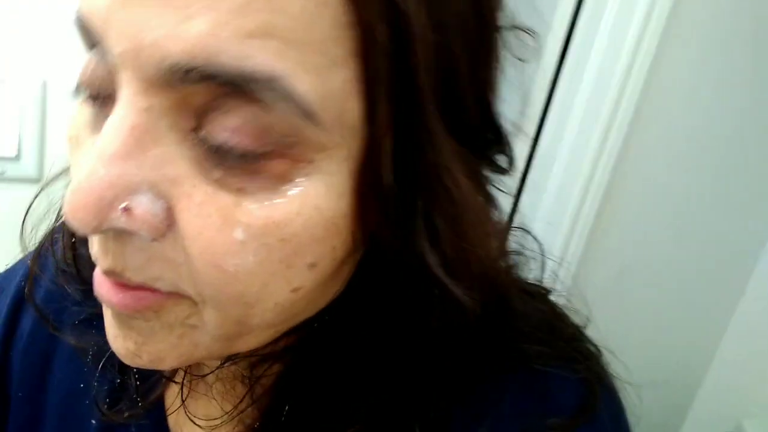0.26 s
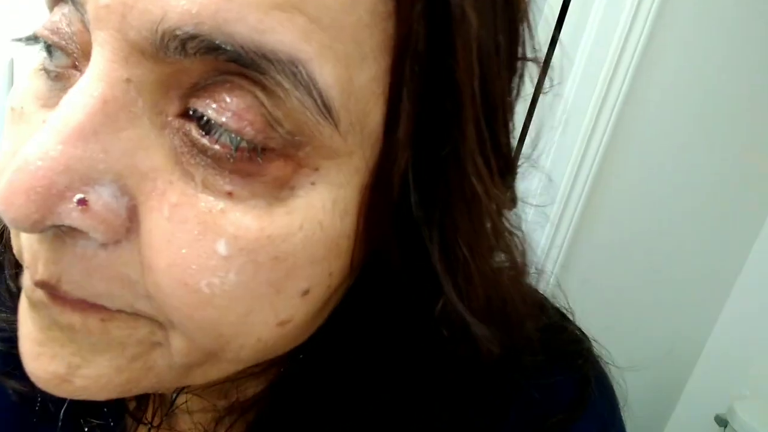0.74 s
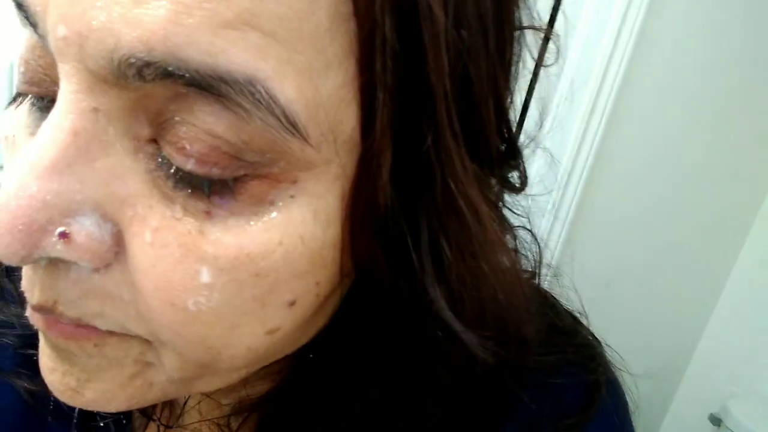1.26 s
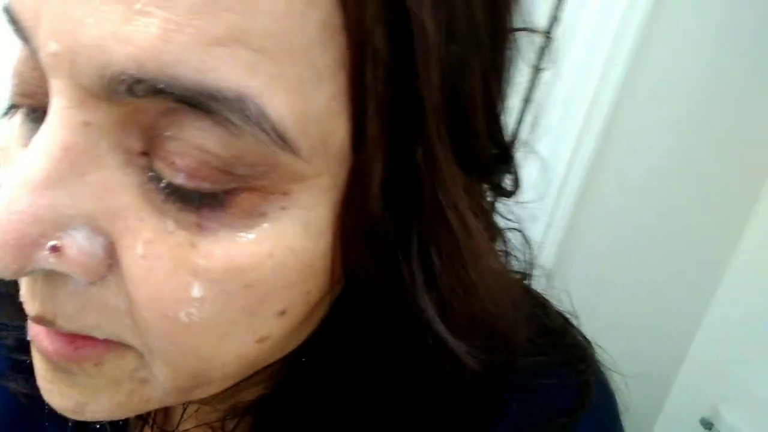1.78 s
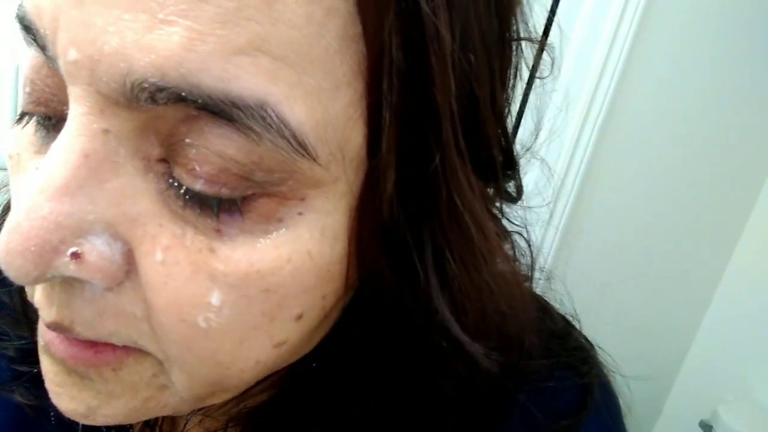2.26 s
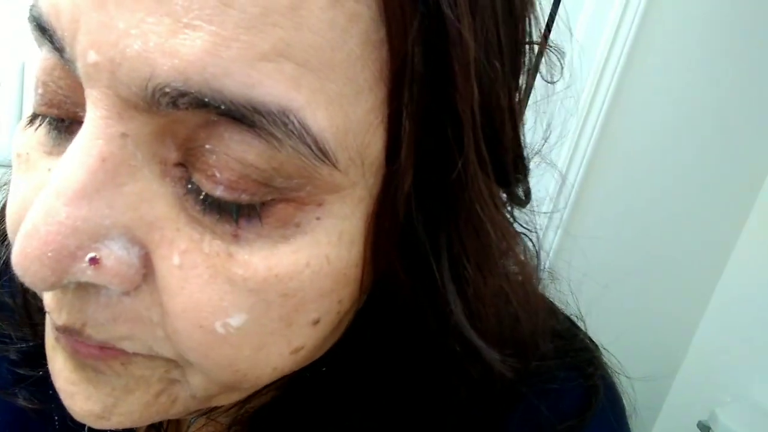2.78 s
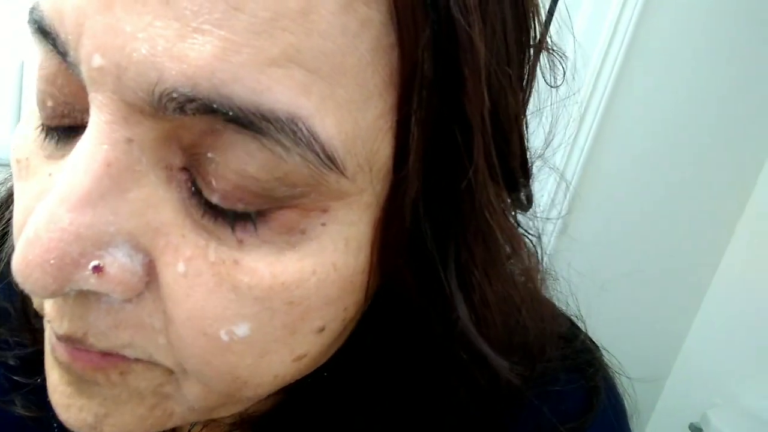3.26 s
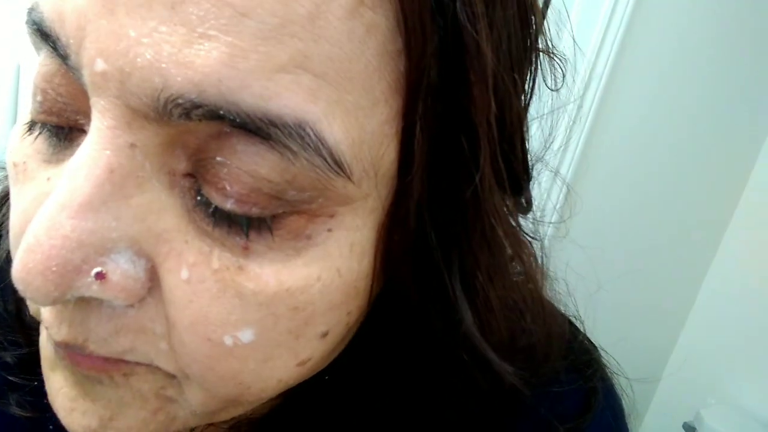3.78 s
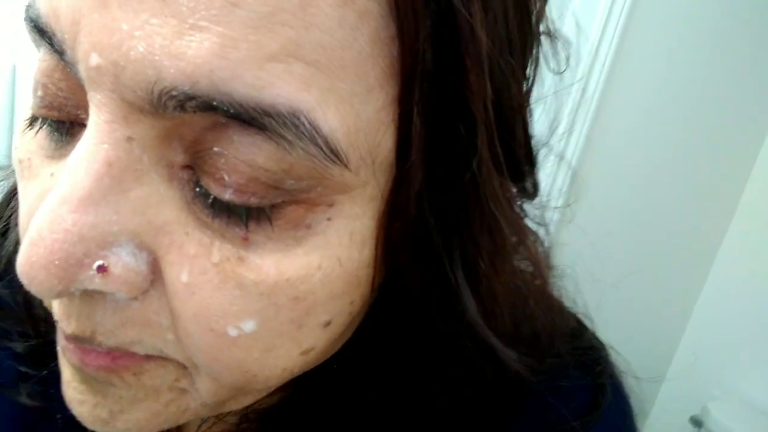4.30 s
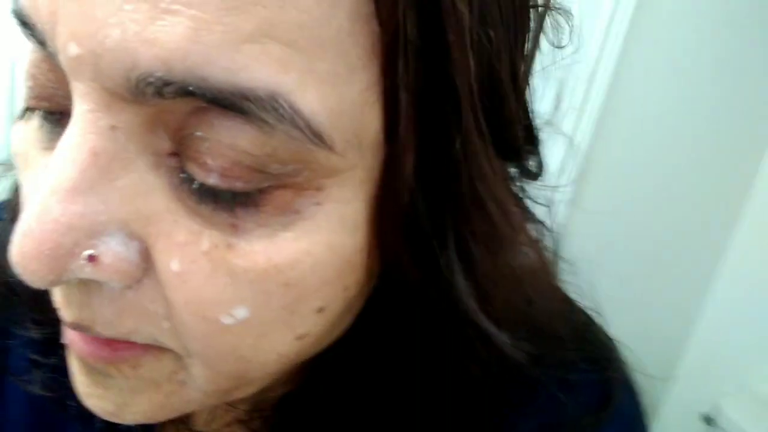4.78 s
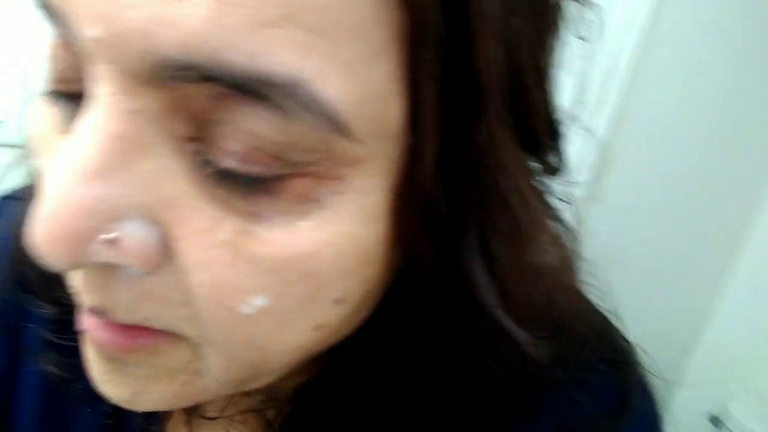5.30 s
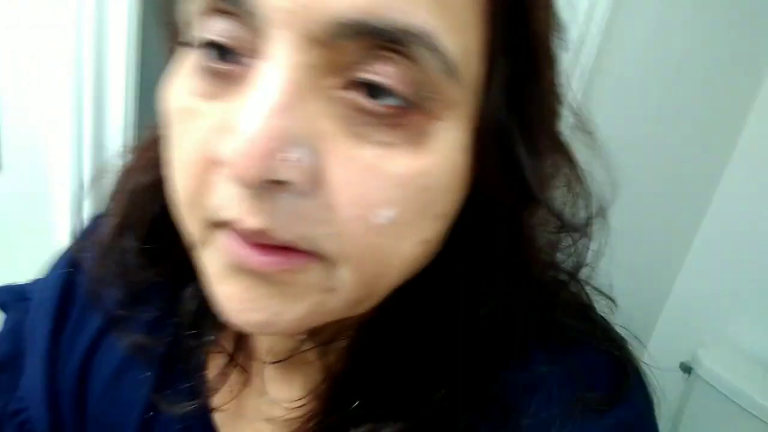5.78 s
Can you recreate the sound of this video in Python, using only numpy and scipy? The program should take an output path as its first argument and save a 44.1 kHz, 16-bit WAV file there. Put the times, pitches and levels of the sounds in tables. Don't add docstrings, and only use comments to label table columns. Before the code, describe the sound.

In a small tiled bathroom, a tap's bright hiss and splash shuts off almost at once, leaving tiny drips and a brief low pipe shudder. After a short quiet, a tissue roll is tugged: paper rustles and crinkles, the roll rumbles round and knocks its holder, with small springy plinks. The loudest blows come near the end, then it settles. A phone held close hears it in stereo, treble leaning left, over a faint low hum.

```python
import sys
import numpy as np
from scipy import signal
from scipy.fft import rfft, irfft, next_fast_len
from scipy.io import wavfile
from scipy.ndimage import uniform_filter1d, map_coordinates

SR = 44100
rng = np.random.default_rng(int(sys.argv[2]) if len(sys.argv) > 2 else 0)


def wrap_up_sound(samples):
    columns = np.atleast_2d(samples).T
    tamed = np.clip(columns, -1, 1)
    steps = np.round(tamed * 32767).astype(np.int16)
    wavfile.write(sys.argv[1], SR, steps)


def boost(x):
    u = np.asarray(x, float) / 20
    return 10 ** u


N = 266805

# start_s [s], peak_db [dB], thud_db [dB], hardness_db [dB], click_db [dB]
HARD_BLOWS = [(1.058, -34, -2.5, 3.5, -33), (1.278, -18.5, -8.5, -2.5, -16), (1.467, -35, -6.5, -8, -18),
              (1.553, -19.5, -5, -1, -20), (1.775, -29.5, -8.5, -7, -35.5),
              (2.59, -40.5, -10.5, -12, -18.5), (2.8155, -29, -8.5, -4.5, -37.5),
              (3.6054, -40, -1.5, -12, -26.5), (4.277, -33.5, -6.5, -17.5, -36),
              (4.358, -25, -11.5, -11.5, -47.5), (4.522, -23, -2.5, 1.5, -20), (4.565, -37.5, 5.5, -8, -23),
              (4.847, -22, -4, 0, -19.5), (5.032, -30, -11, -16.5, -36), (5.1, -20.5, -5.5, 1, -19)]
# pitch_hz [Hz], width_hz [Hz], level_db [dB]
ROOM_WAVES = [(139, 12, 2), (220, 31, 3.5), (335.2, 20, 1.5), (402.6, 21.8, 4.5), (465.3, 22, 1),
              (524, 18, -2.5), (590, 22, 0.5), (728, 58, 0), (904, 44, 0), (1041, 38, 3), (1126, 30, -1.5),
              (1224, 34, 1.5), (1323, 36, -3.5), (1406, 43, -7), (1620, 8.7, -6.5), (1780, 28, -18.5),
              (2210, 45, -3)]
# pitch_hz [Hz], time to fall 60 dB [s]
TILE_DECAY = [(100, 0.51), (260, 0.32), (700, 0.33), (1800, 0.31), (5000, 0.25), (13000, 0.15)]


def tap():
    # time_s [s], jet_db [dB]
    flow = [
        (0.0, -43),
        (0.032, -40.5),
        (0.15, -43.5),
        (0.19, -44.5),
        (0.302, -55),
        (0.398, -81.5),
        (0.48, -86),
    ]
    # pitch_hz [Hz], level_db [dB per Hz]
    jet_colour = [(880, -44), (1500, -11), (2880, -3), (3920, -1.5), (4460, -1), (6060, 0.5), (7460, -3),
                  (12700, 2), (16000, -3.5)]
    # pitch_hz [Hz], level_db [dB per Hz]
    basin_colour = [(71, -36.5), (120, -11.5), (157, -20), (208, 1.5), (259, -11.5), (312, -1), (461, -17),
                    (691, -5.5), (770, -10), (1530, -17.5), (3000, -22.5), (3900, -49), (6600, -120)]
    # start_s [s], peak_db [dB], pitch_hz [Hz], time to fall 60 dB [s]
    spits = [(0.302, -37, 3350, 0.024), (0.2403, -34, 4700, 0.014), (0.302, -38.5, 2320, 0.018),
             (0.3194, -40.5, 3055, 0.088), (0.379, -51, 4500, 0.036), (0.4813, -51.5, 4960, 0.02),
             (0.5057, -59, 2530, 0.071), (0.5626, -57, 2660, 0.036), (0.61, -57.5, 1980, 0.077),
             (0.6894, -64, 3600, 0.044), (.222, -36, 6000, .02), (.26, -36, 6140, .02),
             (.497, -60, 2750, .08), (.598, -60, 2260, .03), (.611, -62, 5060, .1), (.611, -63, 945, 0.086),
             (.612, -62, 3300, 0.072)]
    # time_s [s], pitch_hz [Hz], level_db [dB]
    pipe = [
        (0.68, 82.1, -73),
        (0.752, 84.3, -46.5),
        (0.824, 81.2, -59.5),
        (0.842, 79.1, -48.5),
        (0.884, 82.1, -83.5),
        (0.92, 80, -68.5),
    ]

    jet_db, = curves(flow, -160)
    basin_db = -51 + 0.52 * np.minimum(jet_db + 42, 0)
    water = boost(jet_db + 1.1 * wobble(40)) * rush(jet_colour, grain_db=1.5, grains=700, depth=0)
    water += boost(basin_db + 2.6 * wobble(27)) * rush(basin_colour, grain_db=-0.5, grains=190, depth=0.54)

    pitch_hz, = curves([row[:2] for row in pipe])
    pipe_db, = curves([row[::2] for row in pipe], -120)
    shudder = np.sqrt(2) * boost(pipe_db) * np.sin(2 * np.pi * np.cumsum(pitch_hz) / SR)
    drops = rings(spits, partner=1.95, blur=.14, snap=1.1, wet_db=-8)
    return patches(water, depth_db=1.5) + drops + shudder


def hard_knocks():
    # start_s [s], peak_db [dB], thud_db [dB], hardness_db [dB], click_db [dB]
    rattles = [(0.983, -60, -5, 4, -6), (1.203, -40, -9.5, -12, -36), (1.846, -37, -3, -9.5, -28),
               (1.868, -40, -3, -10, -16), (2.214, -53.5, -6, -14, -20), (2.6684, -47, -2.5, -10, -10),
               (1.748, -52.5, -6, 2, -12), (2.046, -60, 3.5, -12, -24), (2.256, -47.5, -2.5, -14, -36),
               (3.008, -53, -7.5, -6, -24), (3.235, -47, -0.5, -8, -19), (3.379, -54.5, 5.5, -4.5, -32.5),
               (3.419, -46, -9, -18, -28), (3.907, -46, -0.5, -8.5, -13), (4.205, -49, 0, -2, -14),
               (5.2355, -47, -4, 4, -12.5)]
    return knocks(HARD_BLOWS + rattles, attack=.0015)


def soft_strokes():
    # start_s [s], peak_db [dB], thud_db [dB], hardness_db [dB], click_db [dB]
    soft_events = [
        (.135, -49.5, -0.5, -3, -29),
        (.94, -62, 10, 1, -4),
        (1.543, -32, -9, -17, -44),
        (2.67, -46, -4.5, -11, -36),
        (3.978, -40.5, -0.5, -14.5, -13),
        (4.69, -44, 5.5, -1.5, -18.5),
    ]
    return knocks(soft_events, attack=0.013)


def knocks(blows, attack):
    # pitch_hz [Hz], level_db [dB per Hz]
    holder = [(35, -40.5), (60, -5.5), (180, -10.5), (245, -5.5), (338, -0.5), (527, -7), (593, -4),
              (666, -8.5), (1200, -7.5), (1340, -13.5), (2190, -17), (8510, -43.5), (12400, -42),
              (16000, -52.5)]
    # pitch_hz [Hz], level_db [dB]
    usual = [(300, 1), (640, 2.5), (1250, -0.5), (2800, -10.5), (8500, -23.5)]
    out, length = np.zeros((2, N + SR)), SR // 2
    t = np.arange(length) / SR
    centres_hz, usual_db = np.transpose(usual)
    for s, db, thud_db, hard_db, click_db in blows:
        # thud, body, 1 kHz knock, 3 kHz clack and click; hardness lifts both knock and clack
        bands_db = np.array([thud_db, 0, hard_db, hard_db - 6.5, click_db])
        shift = np.transpose([centres_hz, bands_db - usual_db])
        swell = t / attack * np.exp(1 - t / attack) + 0.00073 / attack * boost(-60 * t / 0.0024)
        direct = swell * boost(-20 * t / (3 * attack)) * rng.standard_normal((2, length))

        rise = 1 - np.exp(-t / attack)
        flutter_phase = -1.2 + rng.normal(0, 0.54)
        flutter = boost(2.0 * np.cos(2 * np.pi * 44.0 * t + flutter_phase))
        early = 1 + 0.81 * boost(-60 * t / 0.15)
        early += 0.37 / (1 + (t / .048) ** 16)
        waves = boost(-19.5) * standing_waves(t)
        room = rise * flutter * (early * tail(length) + waves)
        both = boost(0.5) * direct / np.linalg.norm(direct[0]) + room

        def struck_gain(hz):
            tube_db = .7 * max(-29 - click_db, 0) / (1 + ((hz - 1600) / 260) ** 4)
            return boost(along(holder, hz) + along(shift, hz) + tube_db) * room_modes(hz, depth=4.84)

        sound = stereo(both, struck_gain)
        peak = np.sqrt(np.mean(sound[:, :SR // 40].mean(0) ** 2))
        power = 1 + boost(thud_db) ** 2 + boost(hard_db) ** 2
        crack = np.diff(rng.standard_normal((2, length + 1)))
        crack = crack * boost(click_db - 3.0 - 60 * t / 0.012) * 0.0014 / attack
        blow = boost(db - 4.0) * np.sqrt(power) * sound / peak + boost(db) * crack
        out[:, round(s * SR):][:, :length] += blow
    return out[:, :N]


def holder_parts():
    # start_s [s], peak_db [dB], pitch_hz [Hz], time to fall 60 dB [s]
    struck = [(1.059, -28, 1430, 0.09), (1.059, -32, 850, 0.47), (1.06, -32, 597.6, 0.44),
              (1.06, -40, 1950, .1), (1.279, -20, 754, 0.17), (1.279, -29, 590, 0.094),
              (1.555, -23, 697, 0.15), (1.32, -26, 400, .04), (1.597, -29, 398, .04),
              (1.075, -31.5, 1112, 0.18), (2.85, -31, 579, 0.21), (1.777, -36, 590, .15),
              (1.847, -40.5, 590, 0.11), (2.592, -40, 581, 0.24), (2.818, -25.5, 585.5, 0.33),
              (2.82, -34, 1596, 0.13), (3.612, -33, 1055, 0.076), (3.62, -41.5, 590, 0.19),
              (3.67, -40, 1530, 0.071), (3.772, -45.5, 1018, 0.033), (3.88, -46, 1200, .03),
              (3.91, -43.5, 1300, .1), (3.99, -44, 420, .1), (4.075, -41.5, 100.2, 0.12),
              (4.285, -32, 606, .08), (4.36, -29.5, 1056, 0.067), (4.375, -30.5, 590, .15),
              (4.523, -25, 332.4, 0.14), (4.525, -7.5, 393, 0.038), (4.524, -18, 1044, 0.037),
              (4.565, -17, 338, 0.045), (4.848, -16, 1026, 0.059), (4.849, -11.5, 346, 0.049),
              (4.85, -28.5, 2200, 0.1), (4.89, -26.5, 344, 0.086), (5.033, -28.5, 700, .04),
              (5.101, -14, 1059, 0.15), (5.102, -24.5, 1189, 0.22), (5.102, -20.5, 336, 0.036),
              (5.103, -21.5, 590, 0.13), (5.145, -28, 395, 0.033)]
    return rings(struck, partner=1.0, blur=0.03, snap=0, wet_db=-7)


def spring():
    # start_s [s], peak_db [dB], pitch_hz [Hz], time to fall 60 dB [s]
    plinks = [(1.4675, -38.5, 2470, 0.033), (1.7515, -35.5, 2320, 0.081), (2.682, -41, 2300, 0.06),
              (2.684, -56, 3150, 0.059), (2.824, -17.5, 1060, 0.08), (3.2355, -39, 2050, 0.085),
              (3.632, -42, 2170, .04), (3.925, -48, 1300, 0.054), (4.051, -40, 907, 0.19),
              (4.372, -32, 1620, 0.18), (4.937, -24.5, 1950, 0.04), (5.0324, -31, 3150, 0.075),
              (5.236, -23.5, 1890, 0.035)]
    return rings(plinks, partner=1.6, blur=.06, snap=.06, wet_db=-16)


def paper():
    # [s, s]
    tugs = [(.83, -79, -64, 0.08, 0.3), (.96, -76, -65.5, 0.24, 3.5), (1.12, -80, -58.5, 0.17, 0.5),
            (1.21, -69, -62, 0.07, 0.4), (1.41, -66, -52, 0.04, 0.1), (1.66, -64, -63, 0.02, 0),
            (1.875, -74.5, -63, 0.35, -0.2), (2.11, -69, -58.5, 0, 0.2), (2.27, -80, -67, -0.5, 0.3),
            (2.37, -66.5, -55, 0.1, 0.09), (2.575, -73.5, -54.5, 0.04, 0.3),
            (2.685, -68.5, -54.5, -0.09, 0.14), (2.95, -66.5, -54.5, 0.04, 0.15), (3.12, -75, -61, 0, 0.06),
            (3.238, -69.5, -55.5, -0.03, 0.18), (3.425, -77, -62.5, 0.08, -0.14),
            (3.71, -76, -62.5, -0.12, 0.9), (3.86, -65, -55, 0.1, 0.32), (3.92, -68.5, -51.5, 0, 0.12),
            (3.995, -65.5, -45, 0.0858, 0.07), (4.4, -64, -52.5, 0.07, 0.19),
            (4.72, -62, -47.5, 0.06, 0.09), (4.79, -72.5, -59.5, 0.42, 0.2), (3.78, -82, -59.5, -0.2, 0.85),
            (4.47, -70, -59, 0.2, .1), (5.34, -86.5, -72.5, 1.5, 0.9), (5.672, -69, -65, 0.055, 0.1),
            (5.835, -76, -67, 0.07, 0.24)]
    # start_s [s], hiss_db [dB], crinkle_db [dB], time to fall 20 dB [s]
    jolts = [(1.061, -60, -56.5, 0.15), (1.281, -67, -32, 0.1151), (1.469, -68, -54, 0.3),
             (1.557, -56, -39.5, 0.15), (1.748, -60.5, -55, 0.04), (1.847, -77, -58, 0.17),
             (2.817, -75, -55.5, 0.33), (3.604, -72, -56.5, 0.5), (4.2, -65, -57, 0.3),
             (4.528, -55, -41, 0.17), (4.688, -59, -48.5, 0.2248), (4.849, -53.5, -32.5, 0.1275),
             (5.026, -51, -46.5, 0.1171), (5.106, -48.5, -42.5, 0.0771), (5.237, -74, -47, 0.0256)]
    # top_speed_s [s], drag_db [dB], time to rise 20 dB [s], time to fall 20 dB [s]
    spins = [(1.02, -78, 0, 11), (1.26, -56, 0, 1), (1.59, -47, 0.7, 0.4), (1.8, -76, .02, 3),
             (2.37, -56.5, 0.24, 0.2), (2.84, -42.5, 0.0361, 0.25), (3.0, -66, 1.1, 0.5),
             (3.79, -56.5, 0.18, 0.7), (4.44, -43, 0.26, 0.08), (4.74, -46, 0.48, 0.09),
             (5.05, -48.5, 0.4, -0.06), (5.25, -70, -2.2, 0.75)]
    # pitch_hz [Hz], level_db [dB per Hz]
    hiss_colour = [(3500, -29.5), (5500, 6.5), (8500, -0.5), (12000, 4.5), (15500, 2), (17000, -10.5)]
    # pitch_hz [Hz], level_db [dB per Hz]
    crinkle_colour = [(900, -14), (1500, -0.5), (2500, -3), (4500, -9), (7000, -21)]
    # pitch_hz [Hz], level_db [dB per Hz]
    drag_colour = [(110, -26.5), (200, 4.5), (400, 6), (1000, 0), (1700, -39.5)]

    strokes = tugs + [(s, hiss_db, crinkle_db, .002, fall) for s, hiss_db, crinkle_db, fall in jolts]
    s, hiss_db, crinkle_db, rise, fall = np.transpose(strokes)
    stroke = wobble(30)
    fibres = boost(1.2 * stroke)
    bearing = boost(.8 * wobble(15))
    sound = swells(s, hiss_db, rise, fall) * fibres * rush(hiss_colour, grain_db=2.0, grains=1100, depth=0)
    folds = swells(s, crinkle_db - 3.5, rise, fall) * boost(1.9 * stroke)
    sound += folds * patches(rush(crinkle_colour, grain_db=1.0, grains=510, depth=4.28), depth_db=1.5)
    drag = rush(drag_colour, grain_db=2.5, grains=110, depth=1.6)
    return sound + swells(*np.transpose(spins)) * bearing * drag


def scrapes():
    # top_speed_s [s], level_db [dB], time to rise 20 dB [s], time to fall 20 dB [s]
    rubs = [
        (2.562, -50, .025, .06),
        (2.655, -58, .02, .04),
        (2.692, -46, .035, .045),
        (2.745, -57, .05, .05),
        (3.64, -54, .03, .06),
        (5.036, -47, .008, .04),
    ]
    # pitch_hz [Hz], width_hz [Hz], level_db [dB]
    bar = [(1620, 200, -4.5), (2320, 600, 0.5), (3110, 500, -1), (4220, 400, -16)]

    def bar_gain(hz):
        return np.sqrt(sum(boost(2 * db) / (1 + (2 * (hz - c) / w) ** 2) ** 2 for c, w, db in bar))

    slips = boost(1.9 * wobble(300)) * rng.standard_normal((2, N))
    return swells(*np.transpose(rubs)) * unit(stereo(slips, bar_gain))


def clicks():
    # start_s [s], peak_db [dB], time to fall 60 dB [s]
    contacts = [
        (.4805, -66, .008),
        (1.059, -48, .01),
        (1.2786, -41, .01),
        (2.0469, -68.5, .01),
        (2.8156, -54, .01),
        (3.6034, -55, .012),
        (4.3586, -56, .01),
        (4.5228, -40, .012),
        (4.938, -56, .008),
        (5.51, -65, .01),
    ]
    out, t = np.zeros((2, N + SR)), np.arange(SR // 40) / SR
    for s, db, t60 in contacts:
        spike = boost(db - 60 * t / t60) * np.diff(rng.standard_normal(len(t) + 1))
        out[:, round(s * SR):][:, :len(t)] += spike
    return out[:, :N]


def bright_ticks():
    # start_s [s], peak_db [dB], pitch_hz [Hz], time to fall 60 dB [s]
    ticks = [(.52, -62, 2900, .06), (.535, -62, 2500, .05), (.545, -64, 3200, .05), (.52, -66, 5300, .06),
             (.45, -62, 2300, .04), (.612, -62, 2600, .06), (.63, -66, 4000, .05), (.98, -50, 1150, .08),
             (1.059, -38.5, 6000, .02), (1.059, -38, 3100, .02), (1.279, -29.5, 6000, .05),
             (1.279, -33, 5200, .04), (1.468, -43.5, 6800, .04), (1.468, -44, 3300, .04),
             (4.938, -36, 3200, .03), (5.033, -21.5, 470, .03), (5.237, -38, 3300, .03),
             (5.238, -28.5, 1900, .03), (1.2785, -16, 1050, .06), (4.3585, -24, 1100, .03),
             (1.062, -30.5, 1650, .09), (4.71, -36.5, 1050, .15), (2.688, -40, 3100, 0.045),
             (3.908, -42, 1000, .03), (1.8475, -34, 900, .03), (5.0325, -23, 800, .02),
             (2.83, -29.5, 750, 0.22), (1.7495, -45, 2900, .03), (5.105, -28.5, 3900, .03),
             (3.9, -36, 320, .04)]
    return rings(ticks, partner=1.8, blur=.08, snap=0, wet_db=-12)


def dull_lumps():
    # start_s [s], peak_db [dB], pitch_hz [Hz], time to fall 60 dB [s]
    lumps = [(.05, -44, 215, .08), (.14, -40, 716, .06), (.15, -37.5, 220, 0.13), (.205, -46.5, 705, 0.066),
             (.31, -52, 744, 0.037), (.735, -52, 164, .15), (1.15, -49, 131, 0.088), (2.06, -51, 210, .1),
             (2.672, -46.5, 126, 0.089), (3.01, -45.5, 210, 0.088), (3.99, -45, 140, .1),
             (4.27, -50, 130, .1)]
    return rings(lumps, partner=1.3, blur=.02, snap=0, wet_db=-13.5)


def finger():
    # start_s [s], level_db [dB], time to fall 60 dB [s]
    touches = [
        (5.512, -45, 0.042),
        (5.522, -64, 0.063),
    ]
    # pitch_hz [Hz], level_db [dB per Hz]
    case_colour = [(150, -25), (450, 4.5), (1100, 0), (2000, 0.5), (5000, -29), (9000, -38)]
    envelope, t = np.zeros(N), np.arange(N) / SR
    for s, db, t60 in touches:
        envelope += (t > s) * boost(db - 60 * np.abs(t - s) / t60)
    return envelope * rush(case_colour, grain_db=1.5, grains=400, depth=0)


def house():
    # time_s [s], level_db [dB]
    hum = [(0.0, -56.5), (0.1, -51), (0.71, -71), (1.06, -64.5), (1.23, -57.5), (1.9, -54), (2.19, -67),
           (2.37, -61), (2.73, -58), (2.78, -68), (3.0, -53), (3.12, -69.5), (3.27, -63.5), (4.03, -58.5),
           (4.21, -63), (5.22, -59.5), (5.37, -65), (6.05, -67.5)]
    # pitch_hz [Hz], level_db [dB per Hz]
    rumble_colour = [(40, -20), (62, -11.5), (80, -5), (105, -10.5), (170, -17.5), (300, -69)]
    # pitch_hz [Hz], level_db [dB per Hz]
    floor_colour = [(59, -28.5), (100, 3.5), (177, -15), (315, -13), (442, -21.5), (547, -18), (801, -25),
                    (2420, -25), (7770, -40), (15000, -38), (16000, -49)]
    # time_s [s], level_db [dB]
    floor_level = [
        (0, -67.5),
        (.8, -68),
        (1.1, -66.5),
        (5.3, -68.5),
        (6.05, -68.5),
    ]

    line_db, = curves(hum)
    line_hz = 49 + 2.5 * wobble(12)
    line = np.sqrt(2) * boost(line_db) * np.sin(2 * np.pi * np.cumsum(line_hz) / SR)
    s, db = np.transpose(HARD_BLOWS)[:2]
    kicks = swells(s, db - 29.5, 0.082, 0.22)
    shaking = np.hypot(boost(line_db + 1), kicks)
    rumble = boost(-2.0) * shaking * rush(rumble_colour, grain_db=-2.5, grains=18, depth=0)
    floor = rush(floor_colour, grain_db=.7, grains=15, depth=0)
    return line + rumble + boost(curves(floor_level)[0]) * floor


def rings(events, partner, blur, snap, wet_db):
    out, t = np.zeros((2, N + SR)), np.arange(SR // 4) / SR
    for s, db, hz, t60 in events:
        drift = np.cumsum(rng.normal(0, blur, (2, len(t))), 1)
        ring = np.sin(2 * np.pi * hz * t + drift)
        ring += 0.2 * np.sin(2 * np.pi * partner * hz * t + 2 * drift)
        tick = snap * boost(-60 * t / .005) * rng.standard_normal((2, len(t)))
        near = boost(db - 6 - 60 * t / t60) * ((1 - np.exp(-t / .0008)) * ring + tick)
        far = signal.fftconvolve(near, tail(len(t)), axes=1)[:, :len(t)]
        out[:, round(s * SR):][:, :len(t)] += near + boost(wet_db) * far
    return out[:, :N]


def rush(spectrum, grain_db, grains, depth):
    sizes = boost(grain_db * wobble(grains))
    noise = sizes * rng.standard_normal((2, N))
    pair = stereo(noise, lambda hz: boost(along(spectrum, hz)) * room_modes(hz, depth))
    return pair / np.sqrt(np.mean(pair.mean(0) ** 2))


def swells(s, db, rise, fall):
    db, rise, fall = [np.reshape(column, (-1, 1)) for column in (db, rise, fall)]
    t = np.arange(0, N, 64) / SR
    late = t - np.reshape(s, (-1, 1))
    away = np.abs(late / np.where(late < 0, rise, fall))
    rounded = 1.18
    total = np.linalg.norm(boost(db - 20 * away ** rounded), axis=0)
    return np.interp(np.arange(N) / SR, t, total)


def patches(x, depth_db):
    z = signal.stft(x, nperseg=256)[2]
    field = uniform_filter1d(rng.standard_normal(z.shape[1:]), size=4, axis=0)
    field = uniform_filter1d(field, size=5, axis=1)
    return signal.istft(z * boost(depth_db * unit(field)), nperseg=256)[1][:, :N]


def room_modes(hz, depth):
    peaks = sum(boost(2 * db) / (1 + (2 * (hz - c) / w) ** 2) for c, w, db in ROOM_WAVES)
    return np.sqrt(1 + depth * peaks)


def standing_waves(t):
    hz, width, db = np.transpose(ROOM_WAVES)[:, :, None]
    level_luck, pitch_luck, phase_luck = rng.standard_normal((3, 2, len(hz), 1))
    level = boost(db + 5.4 * level_luck - 60 * t / along(TILE_DECAY, hz) / 0.94)
    waves = level * np.sin(2 * np.pi * (hz + .2 * width * pitch_luck) * t + 3 * phase_luck)
    return waves.sum(1) / np.linalg.norm(waves.sum(1)[0])


def tail(length):
    hz, t, z = signal.stft(rng.standard_normal((2, length)), SR, nperseg=256)
    fade = boost(-60 * t / along(TILE_DECAY, hz)[:, None])
    echo = signal.istft(z * fade, SR, nperseg=256)[1][:, :length]
    return echo / np.linalg.norm(echo[0])


def stereo(pair, gain):
    # pitch_hz [Hz], likeness [0 to 1]
    alike = [(60, 1), (130, 1), (290, 0.93), (640, 0.45), (1410, 0.55), (3100, 0.05), (6820, 0.0032),
             (15000, 0.23)]
    size = 2 * next_fast_len(pair.shape[1] // 2 + 4096)
    hz = np.fft.rfftfreq(size, 1 / SR)
    turn = np.arccos(np.clip(along(alike, hz), -1, 1)) / 2
    spectra = rfft(pair, size) * causal(gain(hz)) * [np.cos(turn), np.sin(turn)]
    mid, side = irfft(spectra, size)[:, :pair.shape[1]]
    return np.array([mid + side, mid - side])


def causal(gain):
    cepstrum = irfft(np.log(gain + 1e-6))
    half = len(cepstrum) // 2
    cepstrum[1:half] *= 2
    cepstrum[half + 1:] = 0
    return np.exp(rfft(cepstrum))


def wobble(rate):
    knots = rng.standard_normal(int(N * rate / SR) + 4)
    return map_coordinates(knots, [np.arange(N) * rate / SR])


def curves(rows, outside=None):
    s, *cols = np.transpose(rows)
    return [np.interp(np.arange(N) / SR, s, c, outside, outside) for c in cols]


def along(points, hz):
    f, v = np.transpose(points)
    return np.interp(np.log(hz + 1), np.log(f + 1), v)


def unit(x):
    return x / np.sqrt(np.mean(x ** 2) + 1e-20)


def scene():
    roll = hard_knocks() + soft_strokes() + holder_parts() + spring()
    small = scrapes() + clicks() + bright_ticks() + dull_lumps()
    return tap() + roll + paper() + small + finger() + house()


def top_cut(x):
    return signal.sosfilt(signal.butter(12, 16890, fs=SR, output="sos"), x)


def record(dry):
    # pitch_hz [Hz], level_db [dB]
    ports = [(60, 0), (110, -1.5), (200, 0.5), (380, 4), (700, 2.5), (1290, 1.5), (2380, 6), (4400, 8),
             (8120, 19), (15000, 14.5)]
    # pitch_hz [Hz], level_db [dB]
    microphone = [(20, -30), (32, -10), (45, 3.5), (15750, 0.5), (15950, -44), (16800, -44), (17100, -70)]
    size = 2 * next_fast_len(N // 2 + 2048)
    hz = np.fft.rfftfreq(size, 1 / SR)
    ratio = boost(along(ports, hz))
    right = np.sqrt(2 / (1 + ratio ** 2)) * causal(boost(along(microphone, hz)))
    left = ratio * right * np.exp(-2j * np.pi * hz * 0.00017)
    heard = irfft(rfft(dry, size) * [left, right], size)[:, :N]
    return top_cut(heard)


dry = scene()
out = record(dry)
wrap_up_sound(out)
```